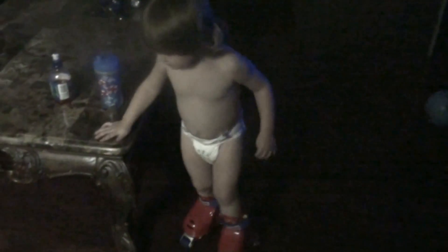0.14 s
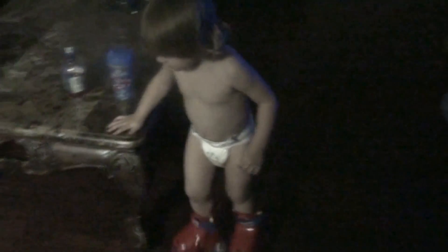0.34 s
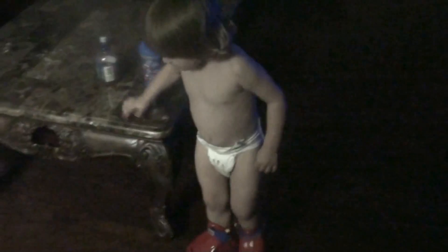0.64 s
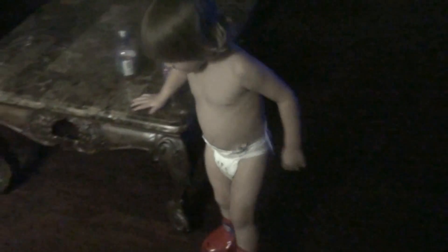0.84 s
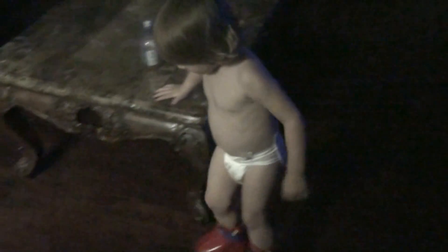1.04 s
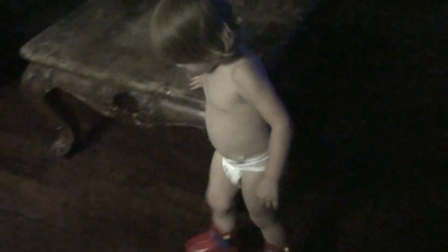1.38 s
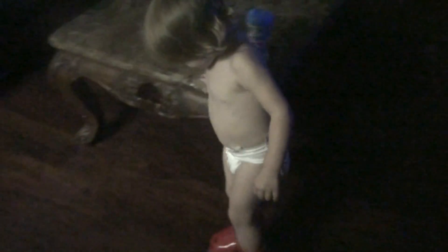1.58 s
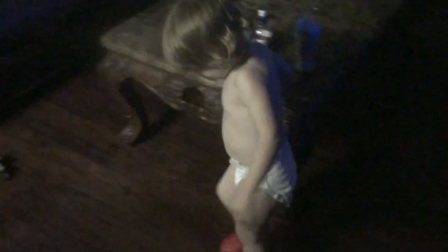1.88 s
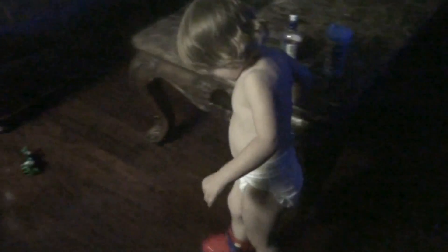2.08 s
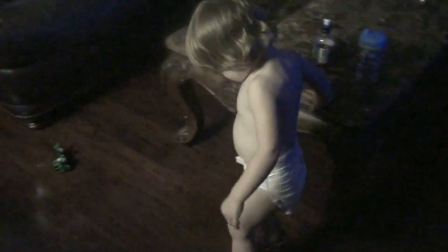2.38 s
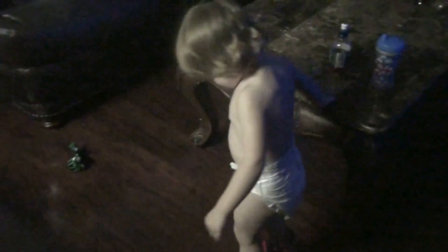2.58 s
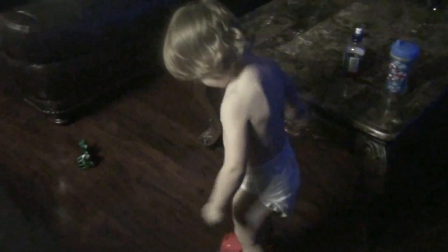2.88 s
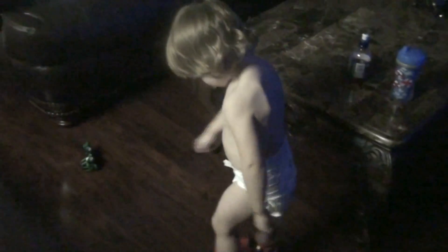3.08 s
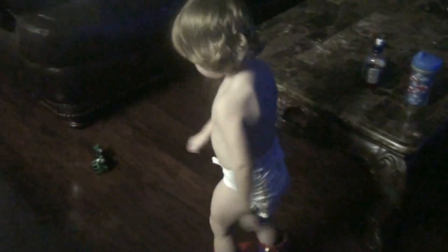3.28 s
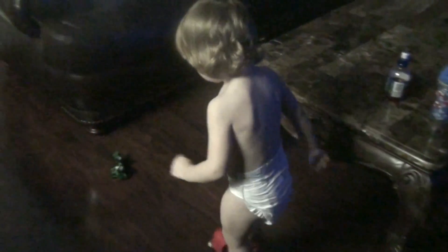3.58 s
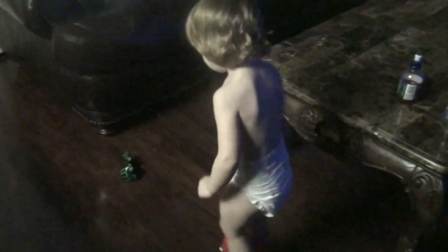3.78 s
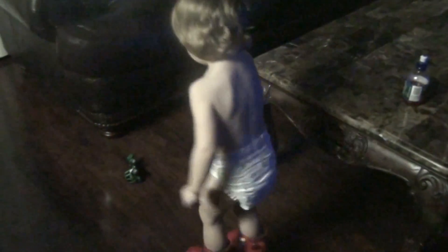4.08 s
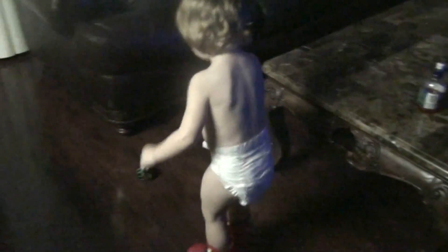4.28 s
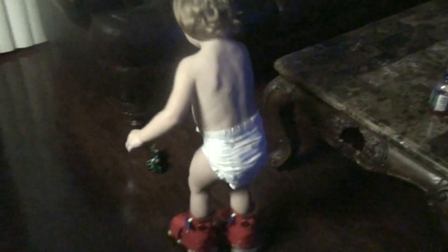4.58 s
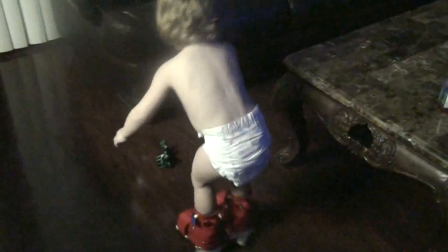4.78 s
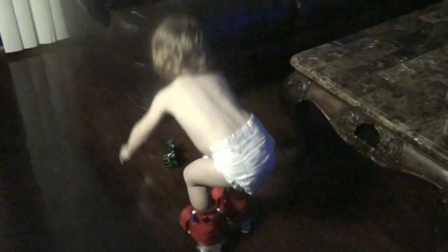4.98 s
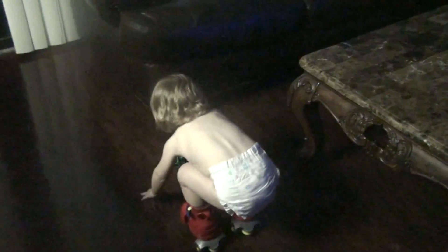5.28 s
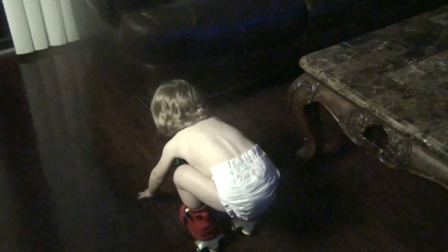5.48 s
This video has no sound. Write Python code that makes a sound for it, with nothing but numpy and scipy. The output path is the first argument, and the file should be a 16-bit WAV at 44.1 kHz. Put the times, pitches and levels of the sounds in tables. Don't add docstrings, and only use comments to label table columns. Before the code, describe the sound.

Hard plastic toy roller skates clack, rattle and roll on a wooden floor in an echoing living room, gradually getting quieter.

```python
import sys
import numpy as np
from scipy import signal
from scipy.fft import rfft, irfft, next_fast_len
from scipy.io import wavfile
from scipy.ndimage import uniform_filter1d

SR = 44100
rng = np.random.default_rng(int(sys.argv[2]) if len(sys.argv) > 2 else 0)


def generate_wav(sig):
    pcm = np.round(np.clip(np.atleast_2d(sig).T, -1, 1) * 32767).astype(np.int16)
    wavfile.write(sys.argv[1], SR, pcm)


def to_linear_factor(level_db):
    exponent = np.asarray(level_db, float) / 20
    return 10 ** exponent


N = 248718
LEAD = 128
CLICK = signal.unit_impulse(1024, idx=LEAD)
CONTROL_STEP = 64


def evened(x):
    return x / np.sqrt(np.mean(x ** 2) + 1e-20)


def add(mix, s, sound):
    part = mix[round(s * SR):][:len(sound)]
    part += sound[:len(part)]


def add_contact(mix, s, sound):
    add(mix, s - LEAD / SR, sound)


def read(points, hz):
    f, value = np.transpose(points)
    return np.interp(np.log(hz + 1), np.log(f + 1), value)


def colour(x, points):
    size = next_fast_len(x.shape[-1])
    gain = to_linear_factor(read(points, np.fft.rfftfreq(size, 1 / SR)))
    return irfft(rfft(x, size) * gain, size)[..., :x.shape[-1]]


def resonate(x, hz, width):
    turn = np.exp(2j * np.pi * np.cumsum(hz * np.ones(len(x))) / SR)
    r = np.exp(-np.pi * width / SR)
    return 2 * (turn * signal.lfilter([1 - r], [1, -r], x / turn)).real


def mode(hz, width):
    return evened(resonate(resonate(CLICK, hz, width), hz, 0.78 * width))


def ticks(per_s, spread_db):
    size = to_linear_factor(spread_db * np.minimum(rng.exponential(1, N), 4)) * rng.choice([-1., 1.], N)
    return evened(size * (rng.random(N) < per_s / SR))


def swell(s, rise, fall):
    t = np.arange(0, N + CONTROL_STEP, CONTROL_STEP) / SR - s
    rising = rise * t - 2500 * t ** 2
    falling = -fall * t - 32 * t ** 2
    return np.where(t < 0, rising, falling)


def spread(v):
    return np.interp(np.arange(N), CONTROL_STEP * np.arange(len(v)), v)


def smear():
    t = np.arange(512) / SR
    z = rfft(rng.standard_normal(512) * t * np.exp(-t / 0.0012))
    return irfft(z / np.abs(z) ** 0.82) / np.sqrt(np.mean(np.abs(z) ** 0.27))


# (pitch [Hz], level [dB])
HISS_COLOUR = [(12, -40), (20, -12), (163, 2), (422, -2.5), (607, -12.5), (1120, -2), (1480, -19),
               (2020, -4), (2600, -30), (3630, -49), (4060, -14), (10200, -26), (16000, -36)]
# (pitch [Hz], width [Hz], level [dB])
DRONE = [(195, 10, -69), (390, 14, -67)]


def room_tone():
    noise = rng.standard_normal((3, N))
    drone = sum(to_linear_factor(db) * evened(resonate(noise[2], hz, width)) for hz, width, db in DRONE)
    mains_hz, mains_db = 120, -58.5
    drone += to_linear_factor(mains_db) * np.sqrt(2) * np.sin(2 * np.pi * mains_hz * np.arange(N) / SR)
    hiss = colour(noise[:2], HISS_COLOUR)
    return to_linear_factor(-51) * evened(hiss) + drone * [[1], [.1]]


# (pitch [Hz], level [dB])
PLASTIC_ON_WOOD = [(120, -19), (200, -23.5), (491, -12.5), (1180, 5), (1680, 3.5), (3560, 1), (4600, -7),
                   (6760, -13), (10900, -24.5), (11900, -23), (16000, -42)]


def plastic(x):
    return colour(x, PLASTIC_ON_WOOD)


# (pitch [Hz], time [s])
ECHO_TIMES = [(250, 1), (700, 0.46), (1500, 0.55), (3500, 0.64), (7000, 0.51), (10000, 0.45), (13000, 0.32),
              (16000, 0.43)]


def echoes():
    taps = np.zeros((2, SR))
    at = np.arange(100, SR - 10, 10) + rng.integers(0, 10, (2, (SR - 101) // 10))
    np.put_along_axis(taps, at, rng.choice([-1., 1.], at.shape), 1)
    hz, t, z = signal.stft(taps, SR, nperseg=256)
    build = 1 - np.exp(-t / 0.0048)
    decay = to_linear_factor(-60 * t / read(ECHO_TIMES, hz)[:, None])
    tail = signal.istft(z * build * decay, SR, nperseg=256)[1]
    return tail / np.linalg.norm(tail[0])


def earlier_step():
    skip = 3000
    out = np.zeros((2, N))
    tail = plastic(echoes()[:, skip:SR])
    out[:, :SR - skip] = to_linear_factor(-33.5) * tail / np.std(tail[0, :2000])
    return out


# (delay [s], level [dB])
FIRST_REFLECTIONS = [(.004, -9), (.009, -17.5), (0.019, -29), (.028, -19.5), (0.035, -35)]


def room(x, direct_db):
    out = np.zeros((2, N))
    turn = np.pi * np.arange(N) / SR / 1.3
    for k in range(3):
        tail = echoes()
        add(tail[0], 0, to_linear_factor(direct_db) * smear())
        for delay, db in FIRST_REFLECTIONS:
            add(tail[0], delay, to_linear_factor(db) * smear())
        share = np.sqrt(2 / 3) * np.abs(np.cos(turn + k * np.pi / 3))
        out += signal.fftconvolve((x * share)[None], tail, axes=1)[:, :N]
    return out


# (fastest time [s], rumble level [dB], coasting fade [dB/s], shell pitch [Hz], rattle level [dB])
WHEEL_PUSHES = [(0.0, -13.5, 700, 3830, -28.5), (0.085, -24.5, 40.5, 2600, -47),
                (0.61, -28, 100, 2960, -58), (0.74, -30, 180, 3390, -33), (0.861, -23.5, 77, 2713, -26.5),
                (0.98, -30.5, 55, 2750, -53), (1.18, -27.5, 68, 3420, -52), (1.421, -29, 35, 2490, -57),
                (1.51, -26.5, 66, 3160, -28), (1.59, -22.5, 54, 2980, -32), (2.3, -25.5, 67, 3020, -34.5),
                (2.47, -40.5, 60, 4230, -40), (2.65, -37, 126, 2660, -57), (2.885, -23, 38, 3020, -31.5),
                (3.14, -28, 77, 3240, -36), (3.31, -31, 83, 2130, -47.5), (3.66, -19, 400, 2970, -43),
                (3.85, -28, 22, 2950, -35.5), (4.04, -38, 44, 3300, -47), (4.3, -29, 17, 2980, -34.5),
                (4.509, -29.5, 46, 3130, -31), (4.68, -39.5, 59, 3000, -35), (4.96, -35.5, 24, 2850, -39.5),
                (5.2, -36, 56, 3000, -43.5)]


def wheels():
    spin_up, rattle_fade = 209, 3.65
    power, shell, loose = [], [], []
    for s, rumble_db, coast, hz, rattle_db in WHEEL_PUSHES:
        power.append(to_linear_factor(rumble_db + swell(s, spin_up, coast)) ** 2 + 1e-30)
        shell.append(power[-1] * hz)
        loose.append(to_linear_factor(rattle_db + swell(s, spin_up, rattle_fade * coast)) ** 2)
    hz = sum(shell) / sum(power)
    return spread(np.sqrt(sum(power))), spread(hz), spread(np.sqrt(sum(loose)))


def rolling():
    patter = evened(plastic(ticks(per_s=1200, spread_db=4.4)))
    rumble, hz, _ = wheels()
    return to_linear_factor(-4.0) * rumble * evened(patter + 0.55 * resonate(patter, hz, 1700))


# (time [s], level [dB], pitch [Hz])
RIM_TICKS = [(0.0654, -20.5, 7540), (0.412, -23.5, 5420), (0.5368, -22, 5060), (0.709, -24, 7100),
             (0.8387, -19, 5630), (0.9632, -24.5, 7600), (1.1417, -24.5, 5600), (1.1685, -28, 5550),
             (1.4049, -16.5, 6700), (1.5598, -19, 7150), (1.6745, -31, 5100), (2.066, -21, 5300),
             (2.0964, -22.5, 5500), (2.1405, -18.5, 6640), (2.2694, -29, 6800), (2.3194, -30.5, 6500),
             (2.4155, -30.5, 6800), (2.8507, -16, 5660), (3.0375, -29, 5140), (3.1236, -34, 5960),
             (3.189, -32, 6840), (3.5876, -18, 7500), (3.6969, -19.5, 6500), (3.9614, -25.5, 6600),
             (4.2483, -26, 6300), (4.317, -25, 5400), (4.9347, -38.5, 8800), (5.0942, -38, 6900),
             (5.146, -34, 5300), (5.2294, -34.5, 6650)]
# (time [s], level [dB])
FAINT_RIM_TICKS = [(2.174, -42), (2.4683, -37), (2.626, -46), (3, -37), (3.7208, -33), (3.794, -32),
                   (3.895, -39), (4.451, -30.5), (4.963, -49), (5.199, -40), (5.349, -49), (5.55, -64)]


def rims():
    out = np.zeros(N)
    treble = signal.butter(2, 5500, "high", fs=SR)
    fizz = evened(signal.lfilter(*treble, plastic(CLICK)))
    faint = [(s, db, 6460) for s, db in FAINT_RIM_TICKS]
    for s, db, hz in [*RIM_TICKS, *faint]:
        add_contact(out, s, to_linear_factor(db - 2.0) * evened(fizz + 0.19 * mode(hz, 960)))
    rattle = signal.lfilter(*treble, plastic(ticks(per_s=70, spread_db=4.0)))
    return out + to_linear_factor(2.0) * wheels()[2] * evened(rattle)


# (time [s], blow level [dB], sole level [dB], shell pitch [Hz], shell level [dB])
FOOTSTEPS = [(0.068, -10.5, -10, 2920, -7), (0.413, -10, -19, 2440, -14), (0.537, -14.5, -35, 2000, 0.5),
             (0.709, -15, -12, 3530, -7.5), (0.839, -6.5, -3, 2700, 5), (0.862, -14, -22, 3070, 8),
             (0.96, -13, -12, 2860, -15), (1.142, -7, -2.5, 3470, -4), (1.405, -12, -27, 2080, -1.5),
             (1.559, -8.5, -13, 3750, -8), (2.067, -8, -10, 3000, -16), (2.097, -10.5, -27, 1530, -4.5),
             (2.141, -16.5, -26, 3320, -20), (2.85, -9, -8, 3090, -13), (2.868, -10, -24, 3100, -1),
             (3.588, -9, -8, 1450, -10), (3.602, -10.5, -7, 1470, -5), (3.696, -14.5, -24, 3370, -11),
             (4.249, -12.5, -31, 3130, -13), (4.319, -18, -26, 3400, -11)]
# (time [s], blow level [dB], shell pitch [Hz], shell level [dB])
WHEEL_BOUNCES = [(0.545, -18.5, 3360, 16), (0.739, -25, 3760, -1), (1.158, -16.5, 1463, 14),
                 (1.439, -27, 3730, 12), (1.519, -19.5, 3400, 4), (1.674, -30, 3240, -15),
                 (2.174, -18, 2020, 9), (2.269, -19.5, 3170, -7), (2.415, -28, 4030, 18),
                 (2.47, -36, 2060, 13), (2.505, -35, 4200, 14), (2.625, -33, 2750, -23),
                 (3.125, -23.5, 3700, 11), (3.249, -22, 1990, -2), (3.894, -27, 3120, 17),
                 (3.963, -32, 3100, 5), (4.03, -29, 4470, 12), (4.453, -29, 3500, 14),
                 (4.859, -33, 2730, -5), (4.933, -29, 1250, -10), (4.958, -30.5, 3180, -6),
                 (5, -29.5, 2140, -5), (5.094, -30, 3800, -7), (5.145, -28, 2170, 0),
                 (5.199, -30, 3650, -12), (5.228, -38, 1410, -10), (5.268, -38, 3700, 5),
                 (5.55, -42.5, 2050, -2)]


def clacks():
    out = np.zeros(N)
    crack = evened(plastic(CLICK))
    sole = mode(1250, 340)
    damping = 0.2
    for s, db, sole_db, hz, ring_db in FOOTSTEPS:
        blow = crack + to_linear_factor(sole_db) * sole + to_linear_factor(ring_db) * mode(hz, damping * hz)
        add_contact(out, s, to_linear_factor(db - 8.5) * evened(blow))
    for s, db, hz, ring_db in WHEEL_BOUNCES:
        blow = crack + to_linear_factor(ring_db) * mode(hz, damping * hz)
        add_contact(out, s, to_linear_factor(db - 6.0) * evened(blow))
    return out


# (time [s], level [dB], pitch [Hz])
DRY_KNOCKS = [(0.07, -8.5, 2800), (0.414, -14, 2400), (0.54, -4.5, 2030), (0.711, -27, 3480),
              (0.841, -0.5, 2740), (1.142, -15, 1250), (1.439, -11, 2130), (1.562, -9, 1340),
              (1.674, -7, 3170), (2.14, -10, 3320), (2.467, -18, 3240), (3.125, -14, 3280),
              (3.25, -16, 2790), (3.539, -21, 1080), (3.897, -12, 3030), (3.961, -24, 3170),
              (4.955, -25, 3210), (5.199, -20, 3700), (5.231, -24, 2310), (5.552, -29, 2170)]


def dry_knocks():
    out = board_thuds(gain_db=-24, width=580)
    for s, db, hz in DRY_KNOCKS:
        add_contact(out, s - .002, to_linear_factor(db - 17) * mode(hz, 1730))
    scatter = smear() + to_linear_factor(-8) * np.roll(smear(), 120)
    return signal.oaconvolve(out, scatter)[:N]


# (pitch [Hz], width [Hz], level [dB])
AXLE_TONES = [(5910, 40, -3), (6655, 45, 2), (8412, 50, -1), (11600, 50, 0), (13415, 55, -2),
              (14350, 120, -11)]
# (strongest time [s], level [dB], tilt [dB/octave], fade [dB/s])
AXLE_SWELLS = [(0.1, -44.5, -9, 70), (0.45, -51, -10, 198), (0.6, -53, -3, 40), (0.9, -42, -18, 100),
               (1.0, -41, -2, 220), (1.451, -58, -15, 202), (1.598, -36.5, 1, 300), (1.66, -46, -7, 75),
               (2.2, -48, -15, 250), (2.33, -41, -6, 90), (2.66, -60, -14, 200), (3.126, -46, -0.5, 65),
               (3.258, -56, 2, 110), (3.62, -57, -8, 120), (3.718, -48, -5, 90), (3.9, -48, -4, 80),
               (4.02, -54, 2, 130), (4.33, -45, -7, 120), (4.47, -53, -1, 100), (4.546, -51, 5, 100),
               (4.68, -44.5, -1, 300), (4.975, -57, 5, 100), (5.04, -48.5, -17, 55), (5.24, -52.5, -1, 125)]


def axles():
    out = np.zeros(N)
    for hz, width, db in AXLE_TONES:
        octaves = np.log2(hz / 6655)
        power = 0
        for s, top_db, tilt, fade in AXLE_SWELLS:
            faster = fade * (1 + 0.21 * octaves)
            power = power + to_linear_factor(top_db + tilt * octaves + swell(s, 132, faster)) ** 2
        knocks = to_linear_factor(db - 3) * spread(np.sqrt(power)) * ticks(per_s=220, spread_db=2.5)
        out += resonate(knocks, hz, width) * np.sqrt(SR / width / np.pi) / 2
    return out


# (time [s], level [dB], pitch [Hz])
BOARD_THUDS = [(0.414, -46, 388), (0.959, -39, 533), (1.406, -43.5, 557), (1.439, -55, 546),
               (1.519, -49, 398), (1.56, -44.5, 437), (2.064, -37, 507), (2.853, -49, 566),
               (3.586, -66, 560), (4.249, -49, 470), (4.317, -56, 332), (4.626, -47.5, 337),
               (4.739, -52, 280)]


def board_thuds(gain_db, width):
    out = np.zeros(N)
    for s, db, hz in BOARD_THUDS:
        add_contact(out, s, to_linear_factor(db + gain_db) * mode(hz, width))
    return out


# (pitch [Hz], level [dB])
MICROPHONE_DIFFERENCE = [(60, -22), (130, -20), (290, -17), (640, -9.5), (1410, -8), (3100, -10),
                         (6820, -8), (10600, -6), (11200, -12.5), (15000, -14)]


def left_right(mid, side):
    side = colour(side, MICROPHONE_DIFFERENCE)
    return np.array([mid + side, mid - side])


def scene():
    rings = axles()
    body = clacks() + board_thuds(gain_db=2, width=500) + rolling()
    skates = room(body, -3.0)
    skates += room(rims() + to_linear_factor(-6) * rings, -5)
    skates[0] += to_linear_factor(10.0) * rings + dry_knocks()
    skates += earlier_step()
    mid, side = skates + room_tone()
    return left_right(mid, side - 0.14 * skates[0])


def low_pass(x):
    return signal.sosfilt(signal.butter(12, 16400, fs=SR, output="sos"), x)


def record(dry):
    power_db = 10 * np.log10(uniform_filter1d((dry ** 2).mean(0), 220) + 1e-12)
    fall = np.arange(N) * 39.0 / SR
    held_peak_db = np.maximum.accumulate(power_db + fall) - fall
    over_db = np.maximum(held_peak_db + 24, 0)
    held = dry / to_linear_factor(0.46 * uniform_filter1d(over_db, 100))
    band_limit = signal.firwin(255, 16400, window=("kaiser", 9), fs=SR)
    mix = signal.oaconvolve(held, band_limit[None], "same")
    return low_pass(mix)


dry = scene()
out = record(dry)
generate_wav(out)
```